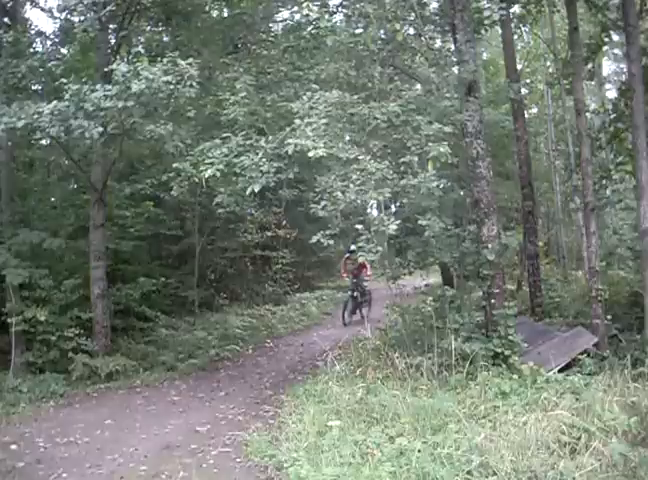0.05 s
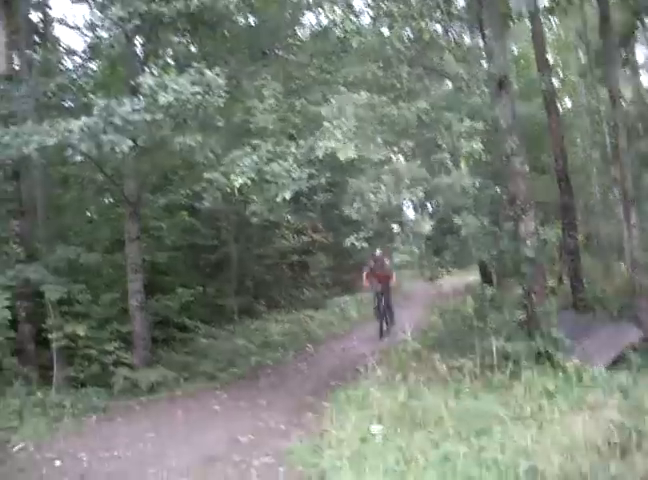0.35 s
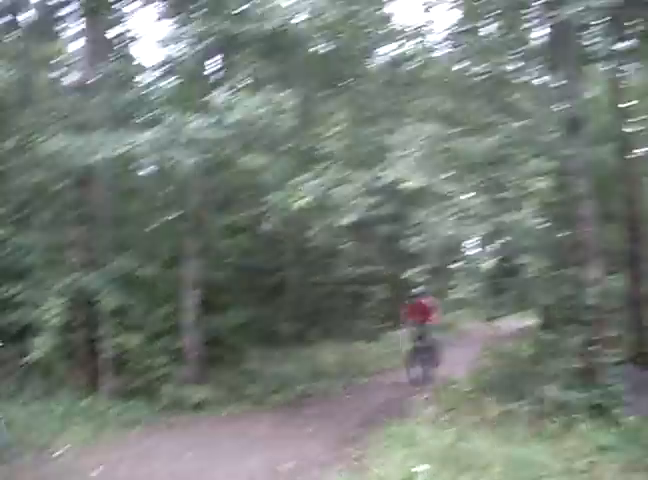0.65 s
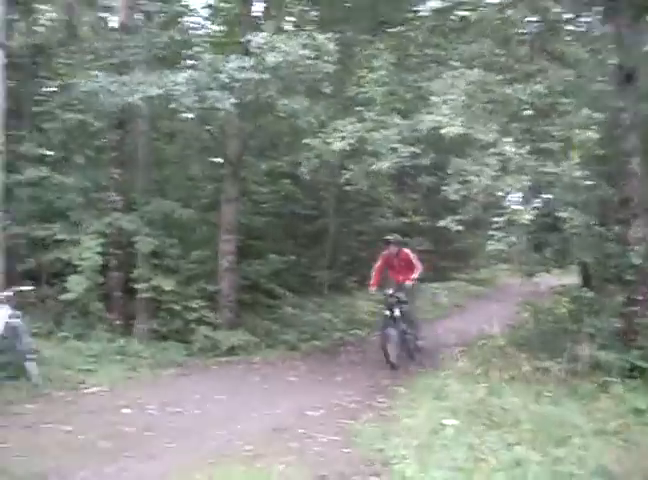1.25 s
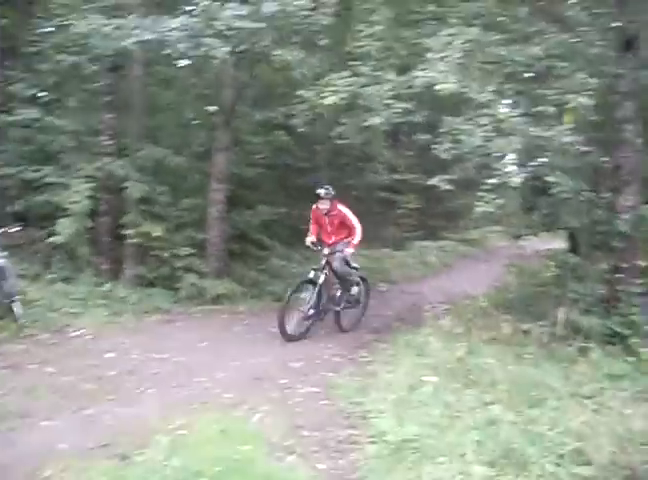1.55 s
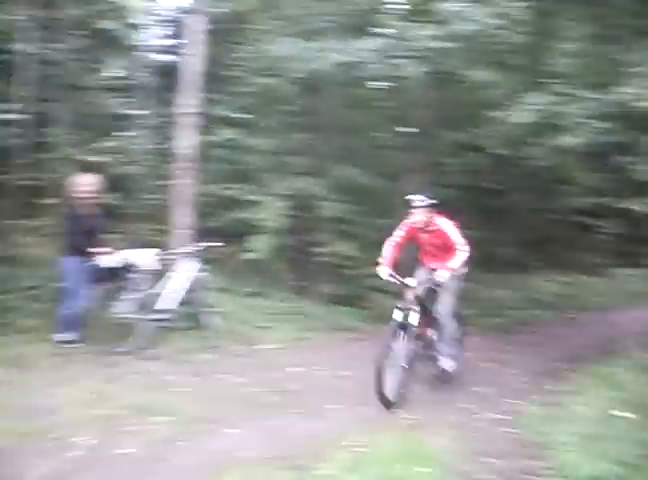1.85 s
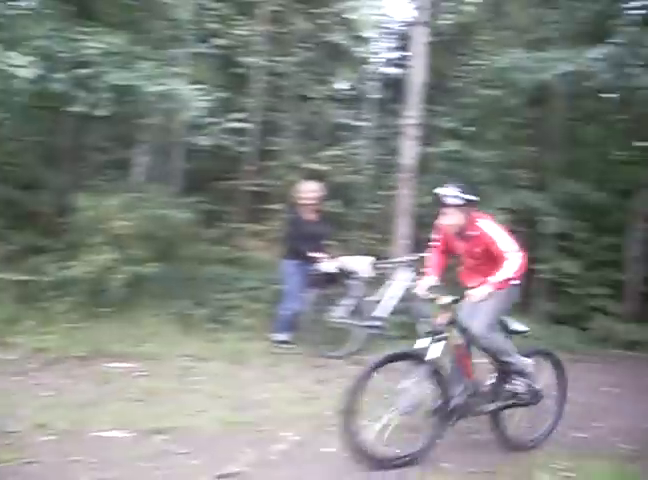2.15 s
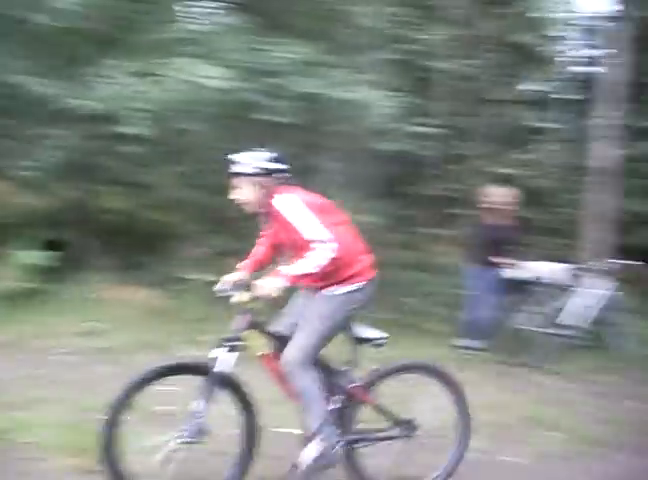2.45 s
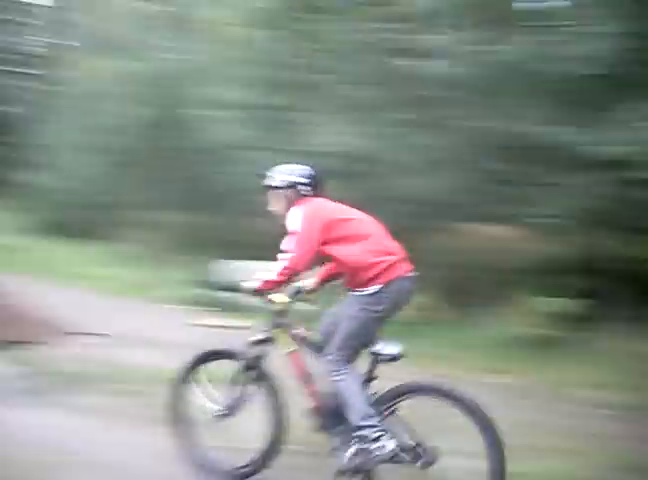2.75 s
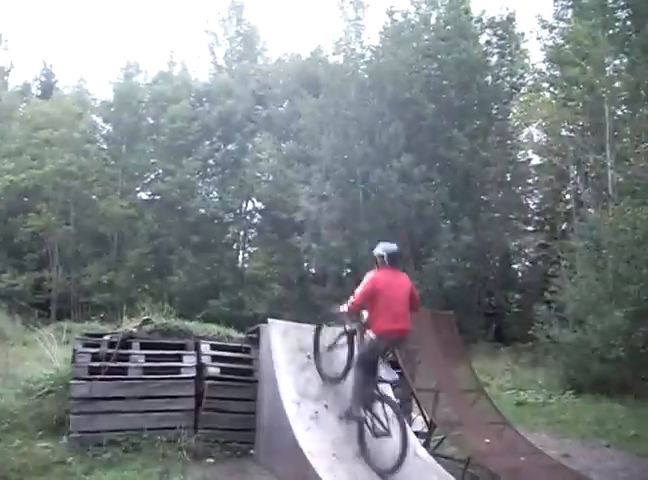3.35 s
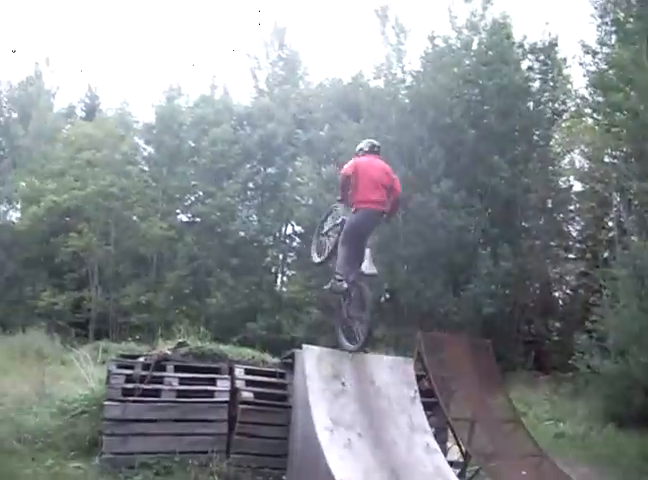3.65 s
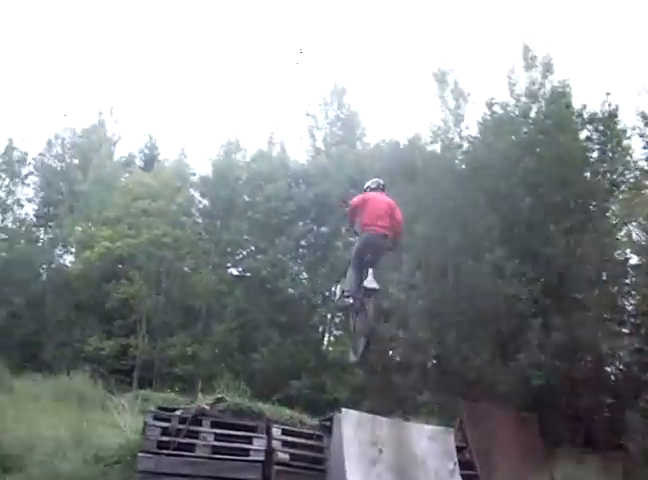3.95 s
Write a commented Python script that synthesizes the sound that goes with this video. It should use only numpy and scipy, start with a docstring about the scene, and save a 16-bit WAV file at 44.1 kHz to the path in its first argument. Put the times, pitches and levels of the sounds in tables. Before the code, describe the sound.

Bicycle tyres crackle over a gritty forest trail, growing louder as they near the microphone. The freewheel starts ticking, the wheels thump up a wooden ramp, and the bike clatters into the air, over a faint hiss of wind.

```python
"""Bicycle over a forest ramp

Beside a dirt path in a softly hissing forest, a bicycle passes close to a small camera's microphone.
Its tyres crunch grit and flick stones; the rider stops pedalling and the freewheel ticks.
The wheels drum up a hollow wooden ramp and knock over its lip, the chain and fork rattle,
and the bicycle ticks away through the air."""
import sys
import numpy as np
from scipy import signal
from scipy.fft import rfft, irfft
from scipy.io import wavfile

SR = 44100
rng = np.random.default_rng(int(sys.argv[2]) if len(sys.argv) > 2 else 0)


def master(y):
    """Save y as 16-bit WAV."""
    cut = np.clip(np.atleast_2d(y).T, -1, 1)
    pcm = np.round(cut * 32767)  # scale
    wavfile.write(sys.argv[1], SR, pcm.astype(np.int16))


N = 176400
TIME = np.arange(N) / SR


def amp(db):
    """Decibels to gain."""
    return 10 ** (np.asarray(db) / 20)


def unit(x):
    """Scales to rms 1."""
    return x / np.sqrt(np.mean(x ** 2) + 1e-20)


def curve(points, t=TIME):
    """Joins (time_s, value) points by straight lines."""
    return np.interp(t, *np.transpose(points))


def colour(x, points, tilt_db=0):
    """Filters by (freq_hz, gain_db) points, tilted per octave for two octaves either side of 3 kHz."""
    octave = np.log2(np.fft.rfftfreq(len(x), 1 / SR) + 1)
    hz, db = np.transpose(points)
    tilt = tilt_db * np.clip(octave - np.log2(3000), -2, 2)
    return irfft(rfft(x) * amp(np.interp(octave, np.log2(hz), db) + tilt), len(x))


def noise(points, size=N, tilt_db=0):
    """Coloured noise of rms 1."""
    return unit(colour(rng.standard_normal(size), points, tilt_db))


def wander(rate_hz):
    """Random drift of rms 1, mostly slower than rate_hz."""
    hz = np.fft.rfftfreq(N, 1 / SR)
    return unit(irfft(rfft(rng.standard_normal(N)) / (1 + (hz / rate_hz) ** 2), N))


def burst(x, t60_s, rise_s):
    """Gives a steady sound a quick rise and a decay; peak near 1."""
    t = TIME[:len(x)]
    decay = np.exp(-np.log(1000) * np.maximum(t - rise_s, 0) / t60_s)
    return .5 * unit(x) * np.minimum(t / rise_s, 1) * decay


def add(mix, start_s, sound):
    """Mixes a sound in at start_s."""
    part = mix[max(round(start_s * SR), 0):][:len(sound)]
    part += sound[:len(part)]


# Crunch of the grit, heard from beside the path: time_s, level_db
CRUNCH_LEVEL = [(0, -68.5), (.35, -65.5), (.58, -63), (.65, -68.5), (.8, -60), (1.05, -60), (1.27, -66.5),
                (1.55, -63), (1.78, -59), (1.97, -64), (2.15, -58.5), (2.25, -58.5), (2.37, -54.5),
                (2.43, -55.5), (2.5, -52), (2.6, -57.5), (2.67, -52), (2.71, -63), (2.76, -56),
                (3.02, -61.5), (3.1, -55.5), (3.2, -54.5), (3.34, -50.5), (3.45, -61), (3.55, -66.5),
                (3.63, -62.5), (3.8, -75)]
# Spectrum of cracking grit: freq_hz, gain_db
GRIT_SPECTRUM = [(200, -18), (500, -18.5), (1000, -7.5), (1500, -4.5), (2100, -4), (2900, -0.5),
                 (4000, -4.5), (5500, -4.5), (7500, -8), (10000, -11)]
# Treble band of the crunch: freq_hz, gain_db
TREBLE_BAND = [(4000, -27), (7000, -2.5), (10500, -2.5)]
# Rise and fall of that treble as the tyres pass: time_s, gain_db
TREBLE_GAIN = [(0, 0.5), (1.3, -1), (1.75, 2.5), (2.2, 2), (2.5, -4.5), (3.0, -0.5), (3.35, -6), (3.6, 3.5)]
# Dull roll of the tyres: time_s, level_db
ROLL_LEVEL = [(0, -90), (.9, -75), (1.4, -74), (1.6, -72.5), (2.0, -67), (2.4, -64), (2.5, -56), (2.7, -60),
              (2.8, -59.5), (3.02, -66.5), (3.06, -58.5), (3.2, -55), (3.3, -52.5), (3.55, -62),
              (3.7, -75.5)]
# Spectrum of the roll: freq_hz, gain_db
ROLL_SPECTRUM = [(30, -39), (135, -11), (175, -5), (290, 2.5), (400, 0), (480, -6.5), (600, 3.5), (850, 5),
                 (1100, -0.5), (1500, 0.5), (2200, -18), (5000, -40), (10000, -47)]
# Hum of the tread blocks nearing the microphone: time_s, level_db
HUM_LEVEL = [(.5, -107), (.85, -83), (1.3, -83), (1.55, -75), (1.9, -73.5), (2.1, -80.5), (2.5, -82),
             (2.9, -94)]
# Spectrum of the hum: freq_hz, gain_db
HUM_SPECTRUM = [(130, -39), (172, -8.5), (200, -3.5), (235, -8.5), (330, -14.5), (700, -68)]


def tyres(grains_per_s=4000, spread_db=2.5, clump_db=1.54):
    """Clumps of tiny grit cracks over the dull roll and low hum of the tread."""
    sizes = amp(spread_db * np.minimum(rng.exponential(1, N), 5)) * rng.choice([-1, 1], N)
    cracks = sizes * (rng.random(N) < grains_per_s / SR)
    grit = unit(colour(cracks, GRIT_SPECTRUM))
    treble = colour(grit, TREBLE_BAND)
    grit = grit - treble + amp(curve(TREBLE_GAIN)) * treble
    roll = noise(ROLL_SPECTRUM) * amp(curve(ROLL_LEVEL) + 1.6 * wander(30))
    crunch = grit * amp(curve(CRUNCH_LEVEL) + clump_db * wander(81))
    hum = noise(HUM_SPECTRUM) * amp(curve(HUM_LEVEL))
    return crunch + roll + hum


def clack(pitch_hz, width_hz):
    """Noise of rms 1 in one broad resonance of a stone."""
    hz = np.fft.rfftfreq(4096, 1 / SR)
    resonance = 1 / (1 + ((hz - pitch_hz) / width_hz) ** 2)
    bass_cut = hz / (hz + pitch_hz)
    return unit(irfft(rfft(rng.standard_normal(4096)) * resonance * bass_cut))


def pebbles(per_s=45, centre_hz=3110, spread_octaves=0.48, above_crunch_db=2.5, spread_db=2.5):
    """Small pebbles crack at random under the tyres, each at its own pitch."""
    out = np.zeros(N)
    for when, pitch, size in rng.random((int(per_s * N / SR), 3)):
        start_s = when * N / SR
        pitch_hz = centre_hz * 2 ** (spread_octaves * (2 * pitch - 1))
        level_db = curve(CRUNCH_LEVEL, start_s) + above_crunch_db + spread_db * min(-np.log(size), 3)
        crack = burst(clack(pitch_hz, 0.27 * pitch_hz), t60_s=.012, rise_s=0.00054)
        add(out, start_s, amp(level_db) * crack)
    return out


# Stones flicked along the path, and clanks of the frame and chain near 1.6 to 2 kHz (at 2.12, 2.44, 2.64, 2.74
# and 2.93 s): start_s, level_db, pitch_hz, width_hz, t60_s
FLICKS_AND_CLANKS = [(0.592, -50, 1730, 1170, 0.066), (0.6081, -36.5, 1450, 900, 0.0054),
                     (0.710, -51, 2200, 500, .03), (0.758, -45.5, 7000, 4000, 0.025),
                     (0.774, -47, 2000, 1200, 0.026), (0.841, -47.5, 5450, 2000, 0.044),
                     (1.002, -46, 2820, 2200, 0.016), (1.027, -46, 3300, 2500, .02),
                     (1.398, -42, 2100, 990, 0.011), (1.460, -52, 3190, 1200, .015),
                     (1.49, -44.5, 2050, 1100, 0.046), (1.578, -47, 623, 200, 0.037),
                     (1.617, -51, 620, 150, 0.066), (1.840, -42.5, 2610, 1000, 0.013),
                     (1.869, -42.5, 3030, 1200, 0.016), (1.9223, -46, 2790, 1000, .007),
                     (2.028, -45, 1050, 200, 0.033), (2.12, -38.5, 1950, 550, 0.025),
                     (2.146, -44, 3600, 1800, .01), (2.29, -44, 1350, 700, .015),
                     (2.303, -40.5, 8850, 2500, 0.011), (2.33, -40, 1190, 500, 0.031),
                     (2.361, -42, 3250, 1800, 0.048), (2.438, -42, 1600, 403, 0.043),
                     (2.441, -36.5, 4600, 2000, 0.027), (2.478, -44.5, 1460, 900, 0.054),
                     (2.527, -40, 3500, 2000, .012), (2.537, -40, 6000, 4000, 0.0076),
                     (2.608, -48, 1230, 600, 0.016), (2.643, -42.5, 1610, 400, 0.071),
                     (2.65, -30, 4000, 5030, 0.013), (2.652, -46, 2530, 120, 0.13),
                     (2.735, -39.5, 3340, 3460, 0.021), (2.741, -45.5, 1490, 500, .06),
                     (2.8175, -38.5, 2600, 2200, 0.022), (2.9315, -39.5, 1600, 490, 0.018),
                     (3.043, -40, 2140, 1740, 0.021), (3.18, -37, 2730, 1780, 0.011),
                     (3.209, -30.5, 2580, 1940, 0.0066)]


def flicks_and_clanks():
    """Each stone flicked by a tyre, and each clank of the frame or chain, gives a short pitched clack and a
    broad snap."""
    out = np.zeros(N)
    for start_s, level_db, pitch_hz, width_hz, t60_s in FLICKS_AND_CLANKS:
        stone = clack(pitch_hz, width_hz) + 0.51 * noise(GRIT_SPECTRUM, size=4096)
        add(out, start_s, amp(level_db) * burst(stone, t60_s, rise_s=0.00054))
    return out


# Modes of the wooden ramp: pitch_hz, level_db, t60_s
RAMP_MODES = [(42, -28, 0.51), (71, -13, 0.29), (108.3, -12.5, 0.38), (121.95, -2, 0.46), (134, -5.5, 0.38),
              (164, -8, 0.29), (206, -2, 0.22), (233.2, 2.5, 0.16), (266.5, -3.5, 0.17), (291, -5, 0.18),
              (320.2, -5.5, 0.24), (357.7, -12, 0.26)]


def ramp_boom(tilt_db=0, spread_db=2, rise_s=0.0029):
    """The hollow ramp rings after one blow; tilt_db per octave favours its upper modes."""
    t = TIME[:SR // 2]
    hz, db, t60_s = np.transpose(RAMP_MODES)[:, :, None]
    db = db + tilt_db * np.log2(hz / 180) + spread_db * rng.standard_normal(hz.shape)
    modes = amp(db) * np.exp(-np.log(1000) * t / t60_s) * np.sin(2 * np.pi * hz * t)
    boom = modes.sum(0) * np.minimum(t / rise_s, 1)
    return boom / abs(boom).max()


# Tread drumming on the boards: time_s, level_db
DRUM_LEVEL = [(2.98, -130), (3.06, -64), (3.19, -55.5), (3.25, -47.5), (3.3, -54), (3.37, -46), (3.44, -49),
              (3.5, -52), (3.535, -45), (3.56, -55), (3.62, -110)]
# Slap of the plywood sheet: freq_hz, gain_db
SLAP_SPECTRUM = [(100, -4), (380, -14), (490, -10), (615, 4.5), (690, 5), (780, 2), (860, 6), (970, -1),
                 (1120, -7), (1400, -4), (2100, -12.5), (3000, -10), (6000, -32), (11000, -29)]
# Low shudder of the ramp's frame under the load: time_s, level_db
SHUDDER_LEVEL = [(2.96, -110), (3.06, -66), (3.13, -76), (3.22, -59), (3.36, -56), (3.45, -54), (3.54, -68),
                 (3.67, -62), (3.8, -84)]
# Spectrum of the shudder: freq_hz, gain_db
SHUDDER_SPECTRUM = [(12, -38), (26, -11), (42, 12), (75, -10), (110, 9), (220, -60), (600, -65)]
# Wheels hitting the ramp's foot, joints and lip: start_s, boom_db, tilt_db_per_octave, slap_db
WHEEL_KNOCKS = [(3.043, -53.5, 11.5, -45), (3.212, -46.5, 2, -44), (3.239, -48, -2, -34.5),
                (3.250, -42, -4, -37), (3.257, -37, -4.5, -52), (3.270, -37, 6.5, -50),
                (3.311, -57, -4, -33.5), (3.331, -45, -7, -42), (3.361, -38.5, -10.5, -35),
                (3.376, -38, -1.5, -40), (3.407, -42, -1, -38), (3.4805, -34.5, -3.5, -25.5),
                (3.498, -33.5, 8.5, -35.5), (3.513, -54, 2, -32.5), (3.521, -33.5, 3, -30.5)]


def ramp():
    """Tread blocks drum on the boards, the frame shudders, and each knock booms and slaps."""
    ring = ramp_boom()
    tread = amp(curve(DRUM_LEVEL) + wander(25))
    drumming = signal.fftconvolve(tread * rng.standard_normal(N), ring / np.linalg.norm(ring))[:N]
    patter = amp(-4.5) * tread * noise(SLAP_SPECTRUM)
    shudder = amp(curve(SHUDDER_LEVEL)) * noise(SHUDDER_SPECTRUM)
    out = drumming + patter + shudder
    for start_s, boom_db, tilt_db, slap_db in WHEEL_KNOCKS:
        add(out, start_s, amp(boom_db) * ramp_boom(tilt_db))
        slap = burst(noise(SLAP_SPECTRUM, size=8192), t60_s=0.039, rise_s=0.00033)
        add(out, start_s, amp(slap_db) * slap)
    return out


# Jolts to the bicycle at the lip: start_s, level_db, t60_s, tilt_db_per_octave
JOLTS = [(3.457, -38, .008, 7), (3.479, -29, 0.013, -1.5), (3.4815, -31, 0.031, -5),
         (3.504, -29, 0.005, -3.5), (3.5177, -31, 0.054, 1.5), (3.523, -33.5, 0.047, 5.5),
         (3.529, -30, 0.017, 3), (3.536, -44, 0.15, 2)]
# Spectrum of the chain and fork: freq_hz, gain_db
RATTLE_SPECTRUM = [(200, 12), (800, 13.5), (1250, -5), (1700, -2), (2200, 1.5), (2900, 10), (4100, 6),
                   (6000, -2.5), (8500, -6), (10000, -9)]


def rattles():
    """Chain and fork clatter as the wheels leave the lip."""
    out = np.zeros(N)
    for start_s, level_db, t60_s, tilt_db in JOLTS:
        metal = noise(RATTLE_SPECTRUM, size=4096, tilt_db=tilt_db)
        add(out, start_s, amp(level_db) * burst(metal, t60_s, rise_s=0.00038))
    return out


# Rear hub turning against the pawls: time_s, teeth_passed
HUB_TURN = [(2.708, 0), (2.736, 1), (2.816, 5), (2.852, 7), (2.878, 9), (2.915, 11), (2.964, 14),
            (3.04, 18), (3.12, 23), (3.239, 31), (3.385, 40), (3.429, 42), (3.581, 48), (3.648, 50),
            (3.779, 53), (3.919, 57), (3.968, 58)]
# Ticks as the bicycle coasts past and away: time_s, level_db
PAWL_LEVEL = [(2.7, -39), (2.85, -38.5), (3.0, -41), (3.12, -44.5), (3.3, -50), (3.45, -43.5), (3.6, -48),
              (3.78, -45.5), (3.82, -59), (3.86, -54), (3.92, -49), (3.97, -50)]
# Spectrum of a pawl's click: freq_hz, gain_db
PAWL_SPECTRUM = [(1500, -3.5), (4000, -12), (6000, -12), (7500, 0), (8400, 1.5), (9200, 8), (10200, -6),
                 (12000, -3.5)]


def freewheel(spread_db=1.5, second_lag_s=0.0022, second_db=-5.5):
    """Two pawls drop, one just after the other, behind each passing tooth."""
    out = np.zeros(N)
    times, teeth = np.transpose(HUB_TURN)
    for start_s in np.interp(np.arange(teeth[-1] + 1), teeth, times):
        level_db = curve(PAWL_LEVEL, start_s) + spread_db * rng.standard_normal()
        for lag_s, pawl_db in (0, 0), (second_lag_s, second_db):
            tick = burst(noise(PAWL_SPECTRUM, size=2048), t60_s=0.0077, rise_s=0.0004)
            add(out, start_s + lag_s, amp(level_db + pawl_db) * tick)
    return out


# Thin high chirps: start_s, length_s, from_hz, to_hz, level_db
HIGH_CHIRPS = [(0.898, 0.013, 7750, 7700, -60), (1.929, 0.01, 10700, 10300, -53.5),
               (1.930, 0.008, 11800, 11400, -50.5), (2.577, 0.017, 8100, 10000, -50),
               (2.587, 0.0094, 9800, 10800, -44.5)]


def chirps():
    """Brief high tones glide as they swell and fade."""
    out = np.zeros(N)
    for start_s, length_s, from_hz, to_hz, level_db in HIGH_CHIRPS:
        size = int(length_s * SR)
        phase = 2 * np.pi * np.cumsum(np.linspace(from_hz, to_hz, size)) / SR
        add(out, start_s, amp(level_db) * np.hanning(size) * np.sin(phase))
    return out


def trunk_echoes(sound, gain_db=-16.5, t60_s=0.25):
    """Thin scattered echoes come back from the trunks around the path."""
    t = TIME[:SR // 2]
    taps = rng.standard_normal(len(t)) * (rng.random(len(t)) < .05)
    taps *= np.exp(-np.log(1000) * t / t60_s)
    return amp(gain_db) * signal.fftconvolve(sound, taps / np.linalg.norm(taps))[:N]


# Wind in the surrounding leaves: freq_hz, gain_db
LEAF_SPECTRUM = [(25, -6.5), (60, 4.5), (125, -3.5), (175, 0), (300, 0), (600, 3.5), (1000, 2.5),
                 (2000, 0.5), (4000, 0.5), (7000, -4), (10000, -10)]


def leaves(level_db=-65):
    """Wind draws a soft, nearly steady hiss from the leaves."""
    return noise(LEAF_SPECTRUM) * amp(level_db + 0.13 * wander(0.66))


def camera_whine(pitch_hz=7830, level_db=-80):
    """The camera's own faint, wavering whine."""
    phase = 2 * np.pi * np.cumsum(pitch_hz + 30 * wander(25)) / SR
    return amp(level_db) * np.sin(phase)


def scene():
    """The bicycle and the ramp close by, the forest behind them, in mono."""
    ride = tyres() + pebbles() + flicks_and_clanks() + freewheel() + ramp() + rattles() + chirps()
    return (ride + trunk_echoes(ride) + leaves() + camera_whine())[None]


# Treble roll-off of the camera's microphone: freq_hz, gain_db
MIC_RESPONSE = [(100, 1.5), (10200, -0.5), (11000, -8.5), (11700, -16), (12400, -30)]


def record(dry):
    """The small camera starts listening, dulls the top and limits the band."""
    start_s, fade_s, cutoff_hz = .035, 0.015, 12250
    heard = colour(dry[0], MIC_RESPONSE) * np.clip((TIME - start_s) / fade_s, 0, 1)
    lowpass = signal.firwin(301, cutoff_hz, window=("kaiser", 8), fs=SR)
    return signal.oaconvolve(heard, lowpass, "same")[None]


dry = scene()
out = record(dry)
master(out)
```